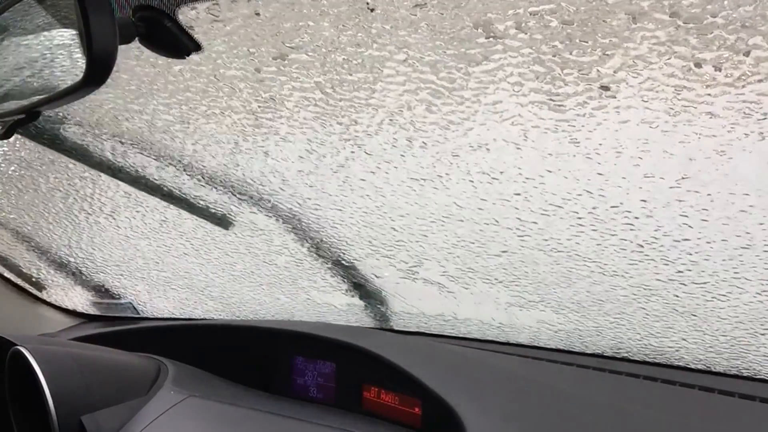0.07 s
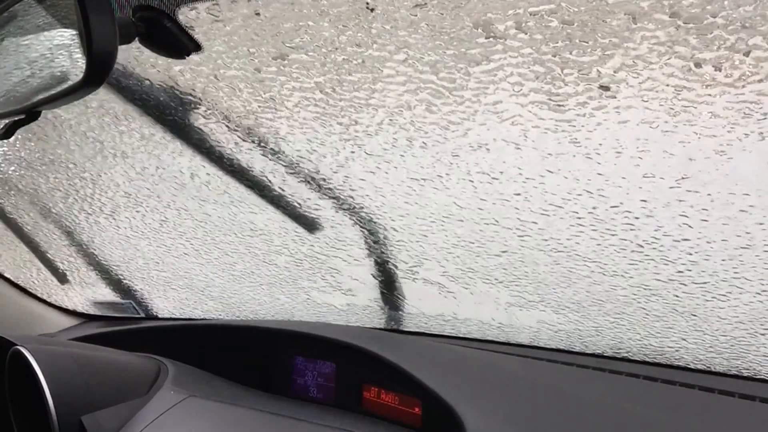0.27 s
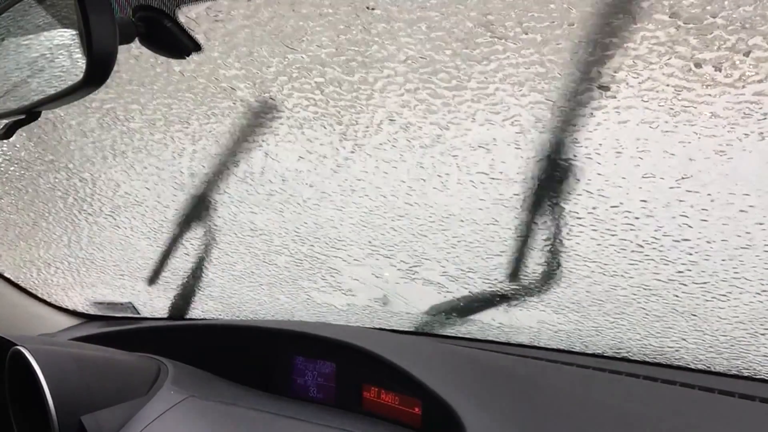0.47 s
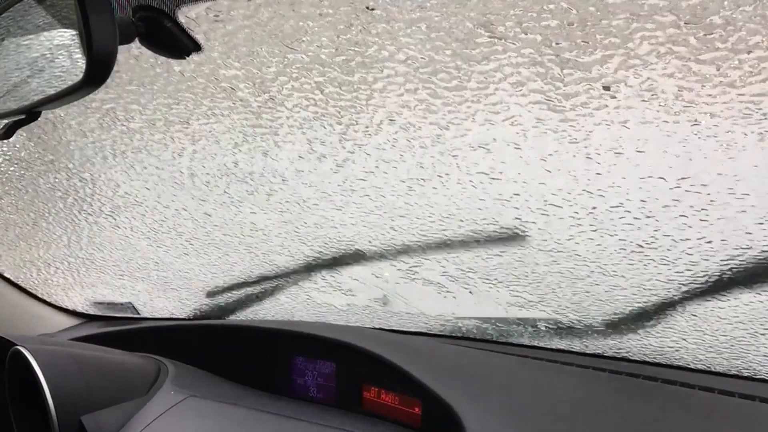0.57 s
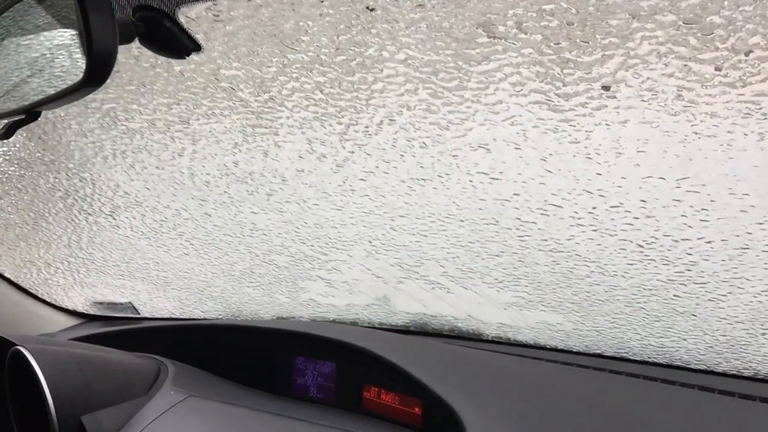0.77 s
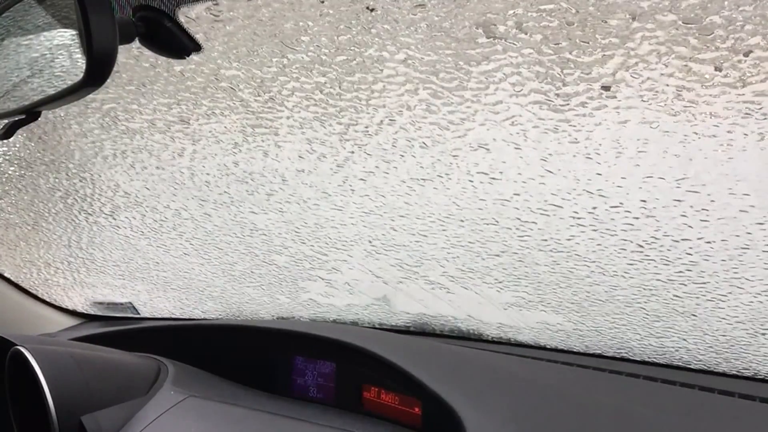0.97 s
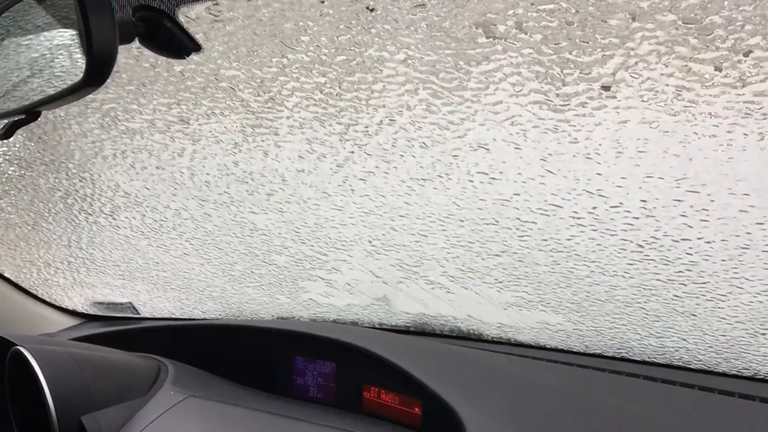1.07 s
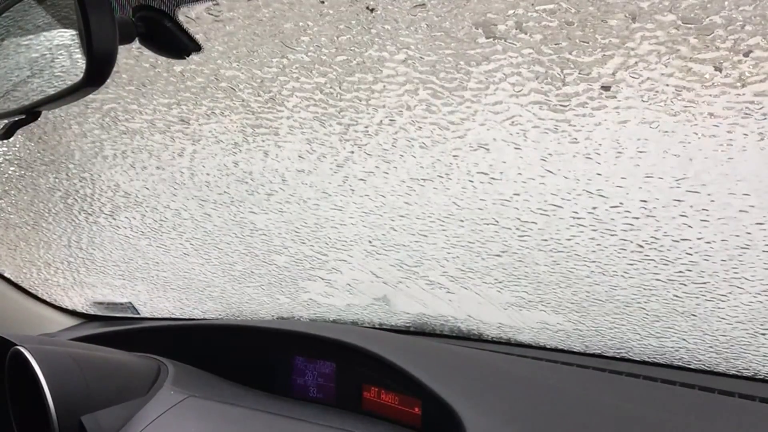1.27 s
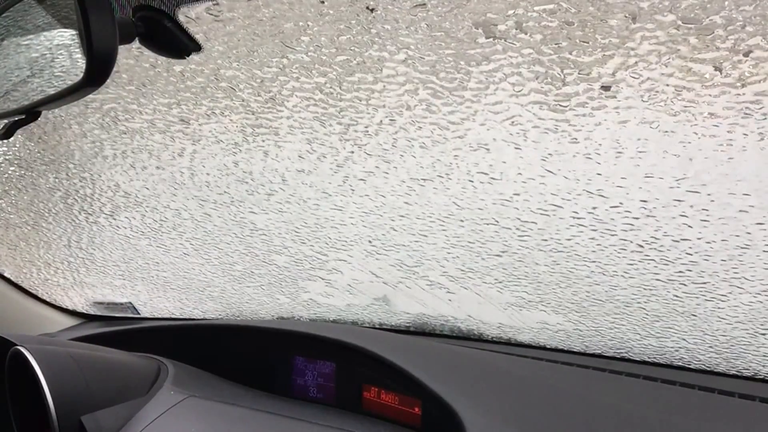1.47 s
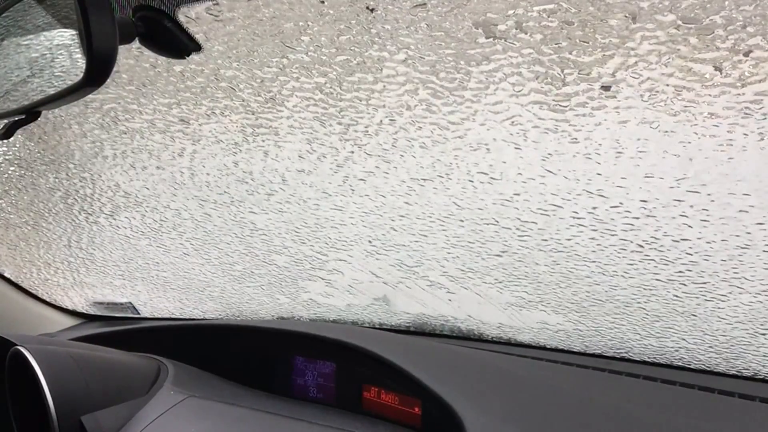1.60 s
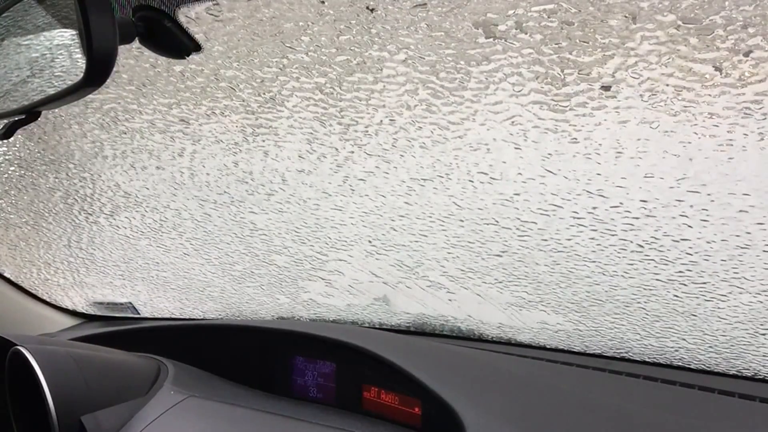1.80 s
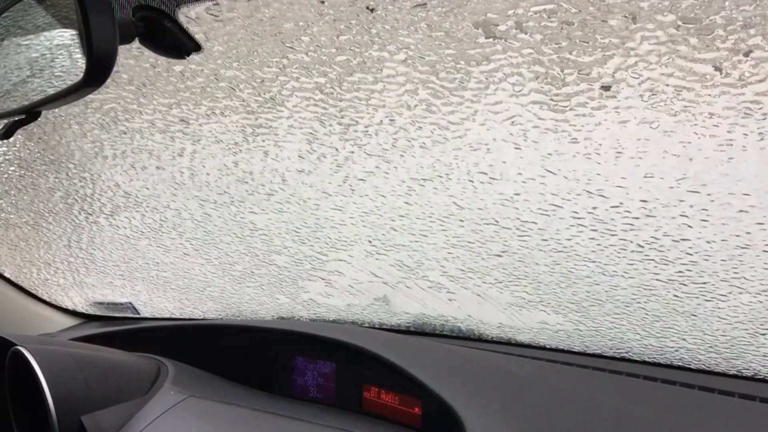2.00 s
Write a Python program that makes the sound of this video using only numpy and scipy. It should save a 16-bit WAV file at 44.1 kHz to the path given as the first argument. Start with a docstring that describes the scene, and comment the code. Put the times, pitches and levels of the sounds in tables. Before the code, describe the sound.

Windshield wipers scrape once up and back over ice, then stop, inside an idling car.

```python
"""Inside an idling car, one microphone in the cabin, close behind an iced windshield.
The wipers scrape up and back: the blades stick and slip, shaking the glass and crushing bumps of ice,
and their rubber edges chatter. The linkage thumps at the turn and at the end, and the arms knock down
into their rest. Underneath, the engine drones on, with a few faint ticks of ice on the glass."""
import sys
import numpy as np
from scipy import signal
from scipy.fft import rfft, irfft, next_fast_len
from scipy.io import wavfile
from scipy.ndimage import map_coordinates

SR = 44100
rng = np.random.default_rng(int(sys.argv[2]) if len(sys.argv) > 2 else 0)


def dump(signal):
    """Clip the signal to [-1, 1] and save it as 16-bit WAV at the path in sys.argv[1]."""
    limited = np.clip(np.atleast_2d(signal).T, -1, 1)
    pcm = np.round(limited * 32767).astype(np.int16)
    wavfile.write(sys.argv[1], SR, pcm)


N = 90184


def amp(db):
    """Decibels to gain."""
    return 10 ** (np.asarray(db) / 20)


def unit(x):
    """Scale to rms 1."""
    return x / np.sqrt(np.mean(x ** 2) + 1e-20)


def since(start):
    """Seconds since a moment, zero before it."""
    return np.maximum(np.arange(N) / SR - start, 0)


def wobble(rate):
    """A smooth random curve, rate knots a second."""
    knots = rng.standard_normal(int(N * rate / SR) + 4)
    return map_coordinates(knots, [np.arange(N) * rate / SR])


def filtered(x, response):
    """x times a response of frequency."""
    size = next_fast_len(N + SR // 2)
    return irfft(rfft(x, size) * response(np.fft.rfftfreq(size, 1 / SR)), size)[:N]


def coloured(x, points):
    """x shaped by a spectrum of (Hz, dB) points, at rms 1."""
    hz, db = np.transpose(points)
    return unit(filtered(x, lambda f: amp(np.interp(np.log(f + 1), np.log(hz + 1), db))))


def level_curves(rows, release_t60=0.18):
    """One dB value per sample for each level column; after the last row it dies away."""
    times, *columns = np.transpose(rows)
    return [np.interp(since(0), times, db) - 60 * since(times[-1]) / release_t60 for db in columns]


def rough_tone(cycles, db):
    """A held tone with a rough flutter of level and phase."""
    flutter = np.exp(2j * np.pi * rng.random()) + 0.55 * (wobble(39.94) + 1j * wobble(39.75))
    return amp(db) * unit(np.real(flutter * np.exp(2j * np.pi * cycles)))


# The engine, heard from inside the car. Each row: multiple of the firing rate, level in dB.
ENGINE_ORDERS = [(1, -60), (2, -55.5), (4, -66.5), (5, -58.5), (6, -61.5), (7, -62.5), (10, -64), (21, -74),
                 (22, -72)]
# The cabin's noise, all around the microphone. Each row: frequency in Hz, relative level in dB.
CABIN_NOISE = [(22, -1), (36, -4.5), (50, 2), (75, 0), (120, -1), (150, -15), (175, -24), (205, -8),
               (260, -14), (300, -10), (365, -18), (405, -10), (510, -26.5), (590, -19), (870, -25.5),
               (1060, -31.5), (1700, -36.5), (2900, -39), (4100, -44), (4550, -44), (4900, -47),
               (7000, -48), (10500, -54.5), (15500, -55.5)]


def idling_engine(firing_hz=40.05, cylinders=4, fan_hz=113.9):
    """Wavering engine orders and a fan tone over cabin noise; the bass throbs once per engine cycle."""
    firings = np.cumsum(firing_hz * (1 + 0.0044 * wobble(11.96))) / SR
    hum = sum(rough_tone(order * firings, db) for order, db in ENGINE_ORDERS)
    fan = rough_tone(fan_hz * since(0), db=-55.5)
    drone = hum + fan + amp(-47.5) * coloured(rng.standard_normal(N), CABIN_NOISE)
    bass = filtered(drone, lambda hz: 1 / (1 + (hz / 150) ** 6))
    throb_db = 3 * np.cos(2 * np.pi * firing_hz / cylinders * (since(0) - 1.612))
    return bass * amp(throb_db + 0.4 * wobble(24.9)) + (drone - bass) * amp(0.7 * wobble(44.6))


# Ice ticking on the far side of the glass.
# Each row: start in seconds, level in dB, pitch in Hz, seconds to fall 60 dB.
ICE_TICKS = [(.179, -44, 3250, 0.024), (0.201, -49, 3400, 0.013), (.214, -44, 3380, 0.011),
             (.245, -40.5, 3000, 0.044), (.264, -54, 3380, 0.014), (.277, -63, 13000, .02),
             (.298, -49, 5460, 0.055), (.402, -50, 5936, 0.0094), (0.492, -42.5, 6470, 0.036),
             (0.828, -27.5, 2600, 0.04), (0.913, -43, 3010, .04), (.933, -39.5, 2580, 0.045),
             (1.147, -69, 3130, 0.17), (1.184, -65, 2450, .05), (1.447, -64.5, 2950, .04),
             (1.481, -65.5, 2900, .13), (1.724, -65, 3150, .08), (1.993, -72.5, 3350, 0.36)]


def ice_ticks(relative_width=0.16, rise_s=0.00095, click_t60=0.0075):
    """Single bits of ice snap on the glass: a tiny click and a short, rough ring."""
    out = np.zeros(N)
    for start, db, hz, t60 in ICE_TICKS:
        t = since(start)
        width_hz = relative_width * hz
        ring = unit(filtered(rng.standard_normal(N), lambda f: 1 / (1 + ((f - hz) / width_hz) ** 2)))
        click = unit(filtered(rng.standard_normal(N), lambda f: f * hz / (f * f + hz * hz)))
        out += amp(db - 60 * t / t60) * (1 - np.exp(-t / rise_s)) * ring
        out += (t > 0) * amp(db - 16.5 - 60 * t / click_t60) * click
    return out


# The linkage, below the windshield.
# Each row: start in seconds, level in dB, pitch in Hz, attack in seconds, seconds to fall 60 dB.
LINKAGE_THUMPS = [(0.274, -19.5, 67, 0.0088, 0.14), (0.852, -14.5, 78, 0.0075, 0.064)]


def linkage_thumps():
    """The linkage gives a low, damped thump where each stroke ends."""
    out = np.zeros(N)
    for start, db, hz, attack, t60 in LINKAGE_THUMPS:
        t = since(start)
        out -= amp(db - 60 * t / t60) * (1 - np.exp(-t / attack)) * np.sin(2 * np.pi * hz * t)
    return out


# The arms landing at the foot of the glass. Each row: start in seconds, level in dB.
ARM_KNOCKS = [(.826, -25.5), (0.9394, -27)]
# An arm's ring. Each row: pitch in Hz, level in dB relative to the knock, seconds to fall 60 dB.
ARM_RING = [(164.7, -13, 0.23), (280.4, -7, 0.18), (390.4, -12.5, 0.068), (461, -11, 0.071),
            (730, -15, 0.026), (903, -12, 0.049), (1430, -18, 0.07)]
# The midrange colour of both the arms' clack and the grinding ice, heard from the cabin.
# Each row: frequency in Hz, relative level in dB.
GRIND_SPECTRUM = [(200, -51), (450, 2), (600, 0), (710, 1), (820, 0), (1050, 0.5), (1300, -1.5),
                  (1480, -1.5), (1620, -6), (1750, -5.5), (2200, -6.5), (2900, -12), (5000, -47.5)]


def arm_knocks(rise_s=0.00093, clack_t60=0.043):
    """The arms drop into their rest, each with a noisy clack and a ring."""
    out = np.zeros(N)
    for start, db in ARM_KNOCKS:
        t = since(start)
        rise = 1 - np.exp(-t / rise_s)
        clack = coloured(rng.standard_normal(N), GRIND_SPECTRUM)
        out += rise * amp(db - 11 - 60 * t / clack_t60) * clack
        for hz, mode_db, t60 in ARM_RING:
            ring_db = db + mode_db + rng.normal(0, 1) - 60 * t / t60
            out -= rise * amp(ring_db) * np.sin(2 * np.pi * hz * t)
    return out


# The rubber edge just outside, higher in pitch near the bottom of the glass.
# Each row: time in seconds, pitch in Hz, level in dB.
RUBBER_CHATTER = [(0, 397.5, -41.5), (.05, 368.2, -31.5), (0.091, 279, -30.5), (0.161, 241.5, -37),
                  (.2, 220, -50), (.29, 161.1, -52), (0.382, 162.4, -32.5), (.46, 108.5, -39.5),
                  (.56, 104.1, -30.5), (.63, 165.8, -31), (0.668, 260.4, -33.5), (.72, 271.7, -33),
                  (0.754, 359.5, -34), (0.801, 404.2, -32.5), (.86, 367.5, -35.5)]


def rubber_chatter(pitch_jitter=0.079, release_t60=0.058):
    """The rubber edge chatters with a rough, gliding buzz."""
    times, hz, db = np.transpose(RUBBER_CHATTER)
    pitch = np.interp(since(0), times, hz) * np.exp(pitch_jitter * wobble(130))
    level_db = np.interp(since(0), times, db) - 60 * since(times[-1]) / release_t60
    return amp(level_db + 2 * wobble(91.4)) * np.sin(2 * np.pi * np.cumsum(pitch) / SR)


def resonate(force, modes):
    """A force shakes a body of (Hz, width in Hz, dB) resonances; dulled above 800 Hz, at rms 1."""
    def body(f):
        return sum((-1) ** k * amp(db) * 1j * f * width / (hz * hz - f * f + 1j * f * width)
                   for k, (hz, width, db) in enumerate(modes))
    return unit(filtered(force, lambda f: body(f) / (1 + (f / 800) ** 4)))


def cabin_ring(x, t60=0.058, zone_s=0.1107, wet_db=-5.5):
    """Direct sound plus a short ring of glass and cabin, new for each zone the blade crosses."""
    t = np.arange(SR // 8) / SR
    blade_place = since(0) / zone_s
    wipe_s = ICE_LEVELS[-1][0]
    wet = np.zeros(N)
    for zone in range(int(wipe_s / zone_s) + 2):
        tail = rng.standard_normal(len(t)) * amp(-60 * t / t60)
        share = np.sqrt(np.maximum(1 - np.abs(blade_place - zone), 0))
        wet += signal.fftconvolve(x * share, tail / np.linalg.norm(tail))[:N]
    return x + amp(wet_db) * wet


def ice_cracks(clumps, per_second=6000, spread_db=3):
    """Ice breaks in dense, tiny fractures of uneven size."""
    hits = rng.random(N) < per_second / SR
    return hits * rng.choice([-1, 1], N) * amp(spread_db * rng.standard_normal(N)) * clumps


# Ice breaking along the two strokes, a pane of glass away from the microphone.
# Each row: time in seconds, then relative levels in dB of grind, crunch, fizz and finest hiss.
ICE_LEVELS = [(0, -33, -37.0, -50, -79), (0.07, -35, -37.5, -50.5, -65), (0.165, -42.5, -44, -59, -87),
              (0.2, -53, -52.5, -75, -85), (0.235, -68, -69, -86, -90), (0.26, -52, -54.5, -71.5, -86),
              (0.3, -40, -45, -63, -69), (0.32, -48.5, -48.5, -64, -84), (0.38, -43, -44.5, -57, -75.9),
              (0.475, -44, -42, -55.2, -81), (0.495, -41.5, -43, -49.1, -64), (0.515, -44, -40.5, -51, -71),
              (0.545, -43, -43.5, -45.5, -59), (0.59, -38, -39.5, -50, -72),
              (0.655, -41.5, -39.5, -50.5, -70), (0.72, -41.5, -39.5, -45.5, -57.5),
              (0.76, -41.5, -37.5, -52.0, -66.0), (0.825, -37.4, -36.5, -47.5, -63),
              (0.855, -42.5, -43, -59, -77), (0.885, -52.5, -58.5, -79, -88), (0.915, -51, -44, -61.5, -84),
              (0.94, -54, -48, -66, -75), (0.96, -67, -73, -91, -95), (1.0, -77, -78, -89.1, -93.2)]
# A dry rasp, strongest on the up stroke. Each row: time in seconds, level in dB.
RASP_LEVELS = [(0, -49), (.07, -43), (.165, -50), (.21, -71.5), (.3, -58), (.38, -52.5), (.55, -46.5),
               (.83, -51), (.87, -64)]
# Colours of the breaking ice, heard from inside. Each row: frequency in Hz, relative level in dB.
RASP_SPECTRUM = [(700, -37), (1200, -13), (1480, -0.5), (1600, -8.5), (1750, 0.5), (2150, -2), (2700, -9),
                 (4500, -41)]
CRUNCH_SPECTRUM = [(900, -65), (1700, -14.5), (2150, -5.5), (2520, 2), (2900, 0.5), (3300, -1), (3900, -5),
                   (4800, -14.5), (7000, -27.5), (12000, -72)]
FIZZ_SPECTRUM = [(3000, -6), (4800, -1), (5400, 0.5), (6600, -3.5), (8000, -11.5), (10300, -21),
                 (15500, -35)]
HISS_SPECTRUM = [(7000, -25), (9300, 4), (10400, -8.5), (12000, 2), (14500, -6), (15500, -5)]
# The shaking in front of the microphone.
# Each row: time in seconds, then relative levels in dB of the glass's shudder and the arms' rattle.
JUDDER_LEVELS = [(0, -28, -42), (0.08, -31, -42), (0.155, -30.5, -34), (0.195, -54, -50),
                 (0.235, -37.5, -54), (0.3, -35, -44.5), (0.39, -34.8, -38.5), (0.48, -29, -39.5),
                 (0.56, -33.5, -35), (0.64, -30.5, -36.5), (0.72, -34.5, -37), (0.82, -30.5, -35),
                 (0.88, -42, -42), (0.93, -38, -43), (1.0, -40, -71)]
# Deep resonances of the glass, hollow ones of the arms.
# Each row: frequency in Hz, width in Hz, relative level in dB.
WINDSHIELD_MODES = [(62, 21, -3), (82.4, 10.3, 0), (116, 20.2, -2), (150.3, 26.3, -1), (174.8, 43.4, -3)]
ARM_MODES = [(239.6, 58, -6.5), (276.3, 24.8, 0.5), (308, 37.4, -3.5), (376.4, 16.7, -1), (402.4, 32, -7)]


def blade_scrape(slips_per_s=135, rate_scatter=0.3, slip_spread_db=2.5):
    """The blades stick and slip at an uneven rate, shaking glass and arms and breaking the ice."""
    grind_db, crunch_db, fizz_db, hiss_db = level_curves(ICE_LEVELS)
    shudder_db, rattle_db = level_curves(JUDDER_LEVELS)
    rasp_db, = level_curves(RASP_LEVELS)
    slip_count = np.cumsum(slips_per_s * np.exp(rate_scatter * wobble(120))) / SR
    slips = np.diff(np.floor(slip_count), prepend=0) * amp(slip_spread_db * rng.standard_normal(N))
    clumps = amp(0.3 * (wobble(150) + np.cos(2 * np.pi * slip_count)))  # a touch louder at each slip
    force = unit(slips) + 0.59 * unit(ice_cracks(clumps))
    shudder = amp(shudder_db - 2) * resonate(force, WINDSHIELD_MODES)
    rattle = amp(rattle_db - 1.5) * resonate(force, ARM_MODES)
    layers = [(grind_db, GRIND_SPECTRUM), (rasp_db, RASP_SPECTRUM), (crunch_db - 1, CRUNCH_SPECTRUM),
              (fizz_db + 1, FIZZ_SPECTRUM), (hiss_db + 0.5, HISS_SPECTRUM)]
    ice = sum(amp(db) * coloured(cabin_ring(ice_cracks(clumps)), spectrum) for db, spectrum in layers)
    return shudder + rattle + ice


def scene():
    """The wipers up close, the idling engine behind them, in mono."""
    wipers = blade_scrape() + rubber_chatter() + linkage_thumps() + arm_knocks()
    return (wipers + ice_ticks() + idling_engine())[None]


def record(dry):
    """The microphone in the cabin drops the deepest bass and everything above its band limit."""
    low_hz, top_hz = 35, 15720
    return filtered(dry[0], lambda hz: (hz < top_hz) * (1 - 1 / (1 + (hz / low_hz) ** 10)))[None]


dry = scene()
out = record(dry)
dump(out)
```